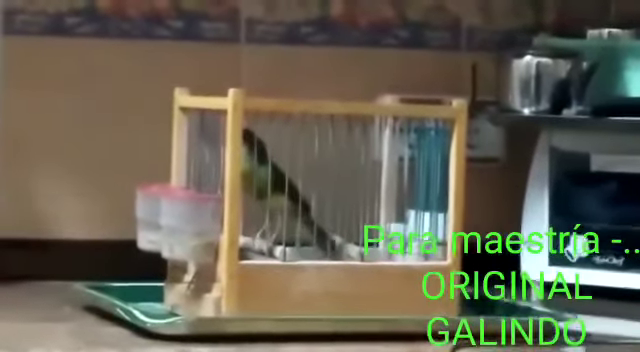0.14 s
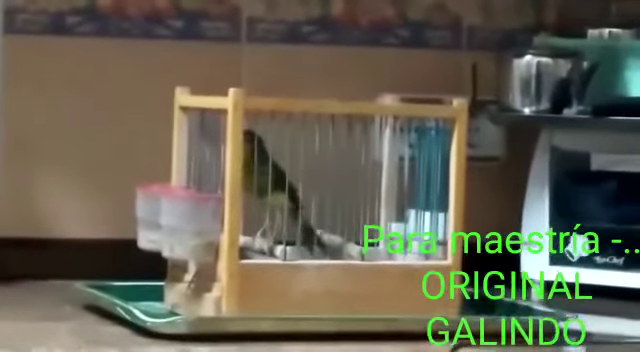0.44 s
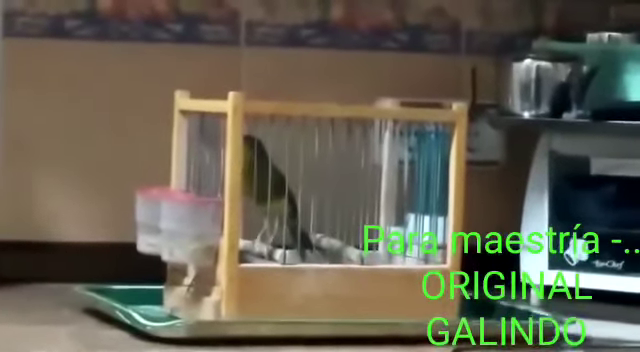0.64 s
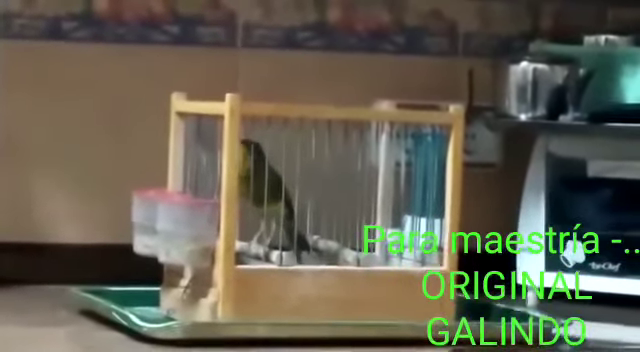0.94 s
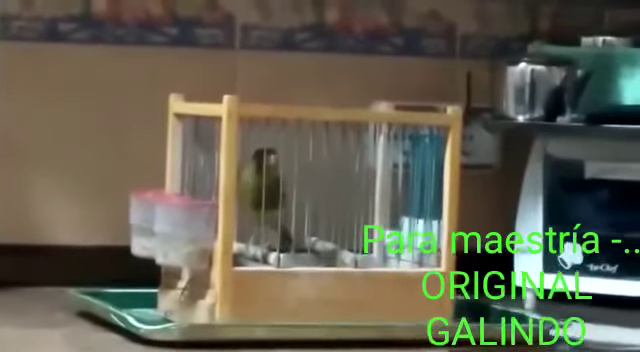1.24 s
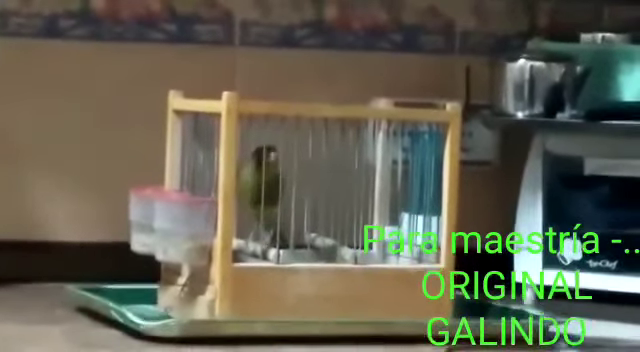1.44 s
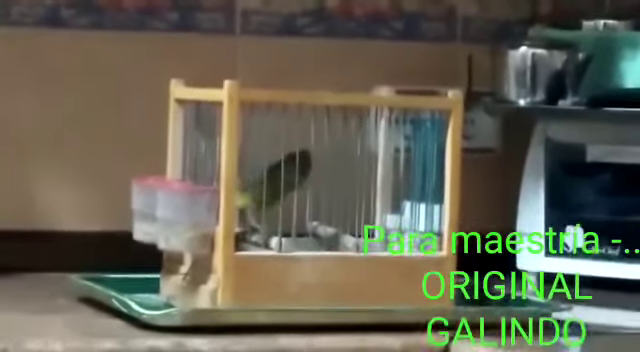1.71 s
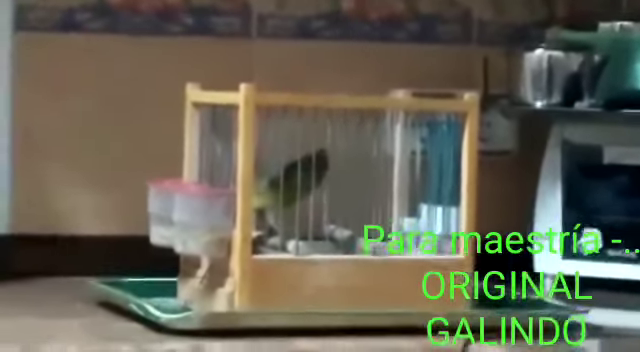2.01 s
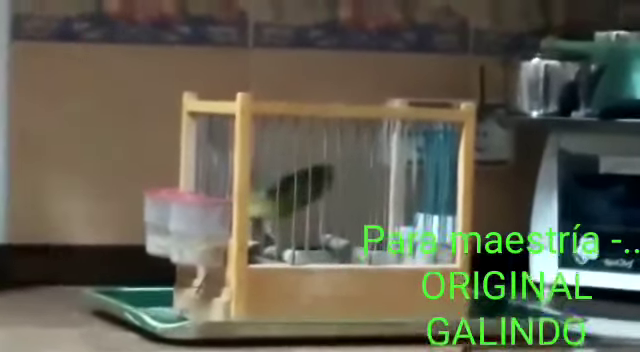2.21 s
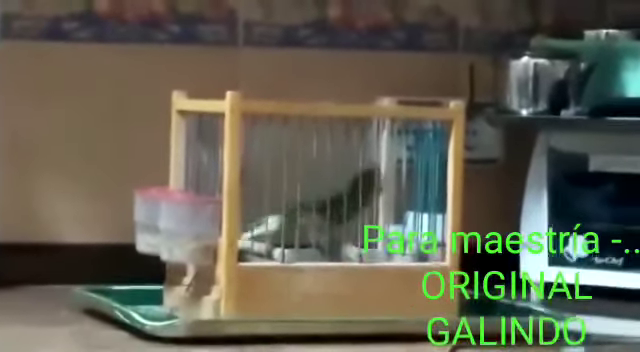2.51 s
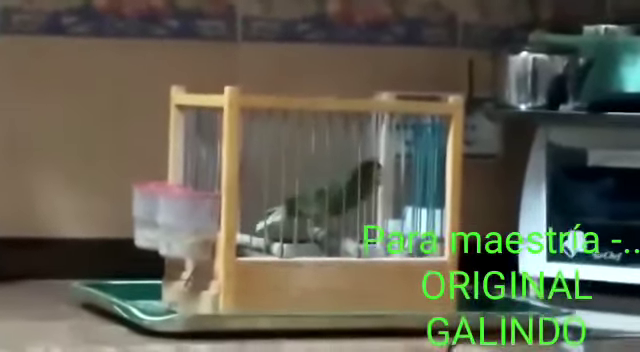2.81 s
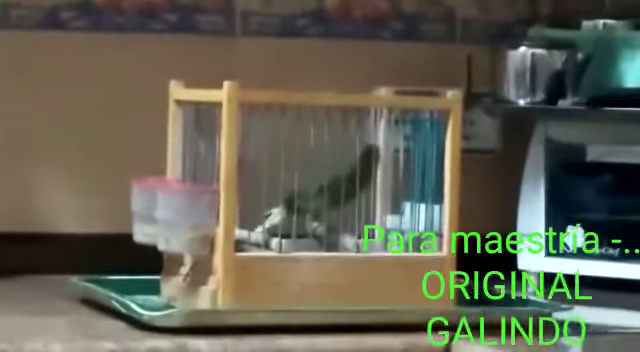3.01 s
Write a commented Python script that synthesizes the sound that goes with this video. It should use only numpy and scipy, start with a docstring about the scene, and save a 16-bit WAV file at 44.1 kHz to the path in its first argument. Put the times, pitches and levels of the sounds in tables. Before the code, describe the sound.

Small songbird trills continuously in a hard-walled kitchen: sharp downward chirps, a quick two-note roll, louder chirps.

```python
"""A caged canary sings in a small hard-walled kitchen, a metre from a two-port microphone.
Falling whistles come first, then a fast two-note roll, then wider falling whistles.
Each note is a sine on a gliding pitch with faint harmonics; dense random echoes smear it.
Filtered noise makes the quiet floor beneath, in which a soft low rumble swells twice.
A slow gain control turns the loud passages down."""
import sys
import numpy as np
from scipy import signal
from scipy.fft import rfft, irfft, next_fast_len
from scipy.io import wavfile
from scipy.ndimage import uniform_filter1d

SR = 44100
rng = np.random.default_rng(int(sys.argv[2]) if len(sys.argv) > 2 else 0)


def log_audio(samples):
    """Write samples as a 16-bit WAV file to the path given in sys.argv[1]."""
    # one column per channel
    frames = np.atleast_2d(samples).T
    # limit to full scale, then quantise
    limited = np.clip(frames, -1, 1)
    pcm = np.round(limited * 32767).astype(np.int16)
    wavfile.write(sys.argv[1], SR, pcm)


def elevation(decibels):
    """Turn decibel levels (scalar or array-like) into linear amplitude ratios."""
    levels = np.asarray(decibels, float)
    return 10 ** (levels / 20)


N = 138915
PAD = 8820  # samples of lead-in, so that notes and echoes can begin before the start


def read(points, hz):
    """A spectral curve given at a few points is interpolated on a logarithmic frequency axis."""
    f, value = np.transpose(points)
    return np.interp(np.log(hz + 1), np.log(f + 1), value)


def pair(a, b, alike):
    """Correlation between two channels: the right spectrum shares the part alike with the left."""
    c = np.clip(alike, -1, 1)
    return np.array([a, c * a + np.sqrt(1 - c ** 2) * b])


def add(mix, s, sound):
    """Superposition: a sound is summed into the mix from s seconds on."""
    part = mix[PAD + round(s * SR):][:len(sound)]
    part += sound[:len(part)]


def whistle(hz, db, rise_s, end_s, overtones_db, weak_db=0):
    """Phase is the integral of frequency; harmonics fade first where the voice is weak."""
    t = np.arange(len(hz)) / SR
    phase = 2 * np.pi * np.cumsum(hz) / SR
    ramp = np.clip(np.minimum(t / rise_s, t[::-1] / end_s), 0, 1)
    strength = elevation(weak_db) * np.sin(np.pi / 2 * ramp) ** 2
    tone = 0
    for k, overtone_db in enumerate([0, *overtones_db], start=1):
        tone = tone + elevation(overtone_db) * strength ** k * np.sin(k * phase)
    return elevation(db) * tone


def falls():
    """Linear frequency glides fall, weaken below a knee and ease out at the bottom pitch."""
    # Each row: time in seconds at which the straight glide passes pass_hz, level in dB, top pitch in Hz,
    # fall in Hz per second, gain in dB reached towards the low end.
    glides = [(-.17, -45, 7670, 70000, -9), (-.078, -26, 7200, 69520, -11.5), (.013, -28, 7270, 71030, -8),
              (0.103, -25.5, 7100, 69900, -16), (0.199, -27.5, 7260, 69600, -27),
              (0.288, -28.5, 7450, 70000, -9), (.382, -28.5, 7130, 70500, -13.5),
              (.476, -27, 7390, 70100, -9.5), (0.567, -28, 7390, 69100, 1),
              (0.659, -28, 7250, 71500, -13.5), (0.755, -28, 7180, 71100, -9.5),
              (0.853, -29, 7246, 72300, -16.5), (0.956, -30, 7360, 67100, 1),
              (2.567, -22.5, 6190, 72200, -3.5), (2.682, -20.5, 7430, 62000, -9),
              (2.793, -21, 7436, 63600, -16.5), (2.906, -22, 7440, 63500, -1), (3.023, -24, 7287, 63000, 5),
              (3.136, -25, 7610, 63000, -12)]
    # Strength along the glide, one list for each phrase. Each row: pitch in Hz, gain in dB.
    phrase_strength = ([(3000, -7), (3600, 1), (4250, -1.5), (4600, -0.5), (5900, 0), (6300, -8.5),
                       (7300, -17)], [(3000, 0.5), (3250, -24), (3850, -23.5), (4200, -2), (5000, 0.8),
                       (6500, 2.1), (7400, -7)])
    second_phrase_s, pass_hz = 2.5, 5500
    bottom_hz, ease_hz = 3009, 143
    knee_hz, knee_width_hz = 4240, 2850
    rise_s, end_s = 0.0036, 0.0026
    out = np.zeros(PAD + N)
    for s, db, top_hz, fall, low_db in glides:
        t = np.arange(0, (top_hz - bottom_hz) / fall + end_s, 1 / SR)
        straight_hz = top_hz - bottom_hz - fall * t
        hz = bottom_hz + ease_hz * np.logaddexp(0, straight_hz / ease_hz)
        weak_db = read(phrase_strength[int(s > second_phrase_s)], hz)
        weak_db = weak_db + low_db * np.clip((knee_hz - hz) / knee_width_hz, 0, 1)
        start_s = max(s - (top_hz - pass_hz) / fall, -PAD / SR)
        add(out, start_s, whistle(hz, db, rise_s, end_s, [-30.5, -32.5], weak_db))
    return out


def tails():
    """Reverberation: two unrelated sparse echo trains, each band decaying at its own rate."""
    # Each row: frequency in Hz, time in seconds to decay by 60 dB.
    decay = [(1500, 0.64), (3000, 0.37), (5000, 0.54), (7000, 0.25), (12000, 0.61)]
    room_db, early_db, early_s = 6, -9.5, 0.011  # energies in dB, then early decay time
    t = np.arange(SR // 2) / SR
    taps = rng.standard_normal((2, len(t)))
    taps = taps * (rng.random((2, len(t))) < .1) * (t > .002)
    hz, frame_s, z = signal.stft(taps, SR, nperseg=128)
    z = z * elevation(-60 * frame_s / read(decay, hz)[:, None])
    tail = signal.istft(z, SR, nperseg=128)[1][:, :len(t)]
    tail = tail / np.linalg.norm(tail, axis=1)[:, None]
    early = taps * np.exp(-t / early_s)
    early = early / np.linalg.norm(early, axis=1)[:, None]
    return elevation(room_db) * tail + elevation(early_db) * early


def heard(song):
    """Convolution: direct sound plus echoes that change as the bird turns, through both ports."""
    # Beak, cage and microphone colour. Each row: frequency in Hz, gain in dB.
    colour = [(1100, 1.5), (1600, -2.5), (2200, -2), (2900, 3.5), (3400, 1.5), (3800, -4), (4400, 0.5),
              (5000, 5), (6000, 0), (7000, -5), (7700, -7), (8300, -14), (8800, -30), (9500, 0.5),
              (11500, -13.5), (12700, -24.5), (13600, -6.5), (15500, -20.5)]
    # Difference between the ports. Each row: frequency in Hz, left minus right in dB.
    ports = [(2000, 1.5), (5600, -1.5), (6500, 7), (7500, 11), (10000, 7.5), (14000, 10.5)]
    # Likeness of the two ports. Each row: frequency in Hz, correlation from -1 to 1.
    likeness = [(2000, -0.29), (2500, 1), (2900, -0.79), (3200, -0.97), (3600, -0.95), (3900, -0.94),
                (4150, 0.84), (4600, -0.0022)]
    # Direct sound as the bird turns. Each row: time in seconds, gain in dB.
    facing = [(0, -3), (.4, -2), (1.001, 4), (1.3, 2.5), (1.699, -0.5), (2.452, 0.5), (2.601, 3),
              (3.15, 3.5)]
    lag_s, turn_hz = .00004, 0.586  # lag of the unlike direct part; half cycles of the echo blend per second
    size = next_fast_len(len(song) + SR // 2)
    hz = np.fft.rfftfreq(size, 1 / SR)
    alike = read(likeness, hz)
    s = (np.arange(len(song)) - PAD) / SR
    direct = song * elevation(np.interp(s, *np.transpose(facing)))
    z = rfft(direct, size) * pair(hz * 0 + 1, np.exp(-2j * np.pi * hz * lag_s), alike)
    turn = np.pi * turn_hz * np.arange(len(song)) / SR
    for k in range(3):
        # the squares of the three shares always sum to one
        share = np.sqrt(2 / 3) * np.cos(turn + k * np.pi / 3)
        z = z + rfft(song * share, size) * pair(*rfft(tails(), size), alike)
    z = z * elevation(read(colour, hz) + np.outer([.5, -.5], read(ports, hz)))
    return irfft(z, size)[:, PAD:PAD + N]


def floor():
    """Filtered noise: quiet house hum and microphone hiss, with two swells of soft low rumble."""
    # Each row: frequency in Hz, spectral gain in dB.
    hum = [(15, -66), (25, -36), (134, -3), (179, -8), (414, -11), (573, -10), (618, -9), (889, -12),
           (978, -10), (2400, -13), (3120, -44), (5280, -120)]
    # Each row: frequency in Hz, correlation of left and right.
    likeness = [(40, 1), (120, 0.5), (340, 0.76), (800, 0.12), (1500, 0.19)]
    # Each row: centre in seconds, half width in seconds, peak gain in dB on the low band.
    swells = [(.19, 0.16, 12), (1.308, 0.11, 11.5)]
    floor_db, hiss_db = -69.5, -79  # rms of the channel mean without swells; hiss against 0 dB of the hum curve
    hz, t = np.fft.rfftfreq(N, 1 / SR), np.arange(N) / SR
    z = pair(*rfft(rng.standard_normal((2, N))), read(likeness, hz))
    x = irfft(z * (elevation(read(hum, hz)) + elevation(hiss_db)), N)
    band = signal.butter(2, (233, 523), "bandpass", fs=SR, output="sos")
    low = signal.sosfilt(band, x)
    swell_db = sum(db * np.exp(-((t - s) / half) ** 2) for s, half, db in swells)
    swell = elevation(swell_db) - 1
    return elevation(floor_db) * (x + swell * low) / x.mean(0).std()


def roll():
    """Exponential pitch relaxation: two voices scoop upward and settle on their end pitches."""
    # Each row: syllable time in seconds, low note level in dB, high note level in dB.
    syllables = [(1.024, -68, -23), (1.095, -37.5, -23.5), (1.162, -35, -24.5), (1.225, -33, -22),
                 (1.295, -40.5, -24), (1.360, -41.5, -25.5), (1.426, -42.5, -24), (1.491, -40, -30),
                 (1.561, -42.5, -27), (1.628, -45, -26), (1.695, -41, -28), (1.765, -41, -29.5),
                 (1.829, -43, -27.5), (1.895, -43, -27), (1.964, -43.5, -28.5), (2.031, -42, -29.5),
                 (2.099, -42, -25.5), (2.167, -43, -25.5), (2.237, -41, -25.5), (2.308, -39, -27.5),
                 (2.380, -40, -23.5), (2.451, -40.5, -27)]
    # Each row: time in seconds, pitch factor of the high notes, twin level in dB against the high note,
    # seconds of scoop left unvoiced.
    drift = [(1.051, 1.006, -13, 0.0037), (1.25, 0.98, -8.5, 0.0027), (1.399, .99, -8.5, .001),
             (1.903, 0.96, -5, .0005), (2.151, 0.97, -3, 0.00056), (2.35, .955, -6, .0005),
             (2.5, 0.97, -5.5, 0.00058)]
    # Low note, high note, and the other voice's twin, which repeats the high pitch with the next low note.
    # Each: offset in seconds, length in seconds, start pitch in Hz, end pitch in Hz, settling time in seconds.
    low, high, twin = (-.007, .024, 1200, 3100, .006), (.024, .023, 3300, 4200, .009), (0.055, 0.022, 3300, 4150, 0.008)
    wobble = 0.01234  # relative pitch scatter from note to note
    rise_s, end_s = .003, .005
    out = np.zeros(PAD + N)
    scatter = 1 + wobble * rng.standard_normal((len(syllables), 3))
    at, pitch, twin_gain, unvoiced = np.transpose(drift)
    for (s, low_db, high_db), (a, b, c) in zip(syllables, scatter):
        up = np.interp(s, at, pitch)
        late = max(np.interp(s, at, unvoiced), 0)
        twin_db = high_db + np.interp(s, at, twin_gain)
        notes = [(high, high_db, b * up, [-19.5, -28.5, -27.5]),
                 (low, low_db, a, [-26, -34]),
                 (twin, twin_db, c * up, [-25])]
        for (offset, length, from_hz, to_hz, settle), db, factor, overtones_db in notes:
            t = np.arange(late, length, 1 / SR)
            hz = factor * (to_hz + (from_hz - to_hz) * np.exp(-t / settle))
            add(out, s + offset + late, whistle(hz, db, rise_s, end_s, overtones_db))
    return out


def scene():
    """Superposition of the song, heard through the room, and the floor."""
    return heard(falls() + roll()) + floor()


def top_cut(x):
    """Nothing passes above the cut-off."""
    return signal.sosfilt(signal.butter(12, 15800, fs=SR, output="sos"), x)


def record(dry):
    """Level compression: slow gain control removes a share of the decibels above a threshold."""
    level_db, squeeze, follow_s = -28, 0.56, 0.13  # threshold, share removed, averaging time
    half = int(follow_s * SR / 2)
    # the shifted window averages past power only
    power = uniform_filter1d((dry ** 2).mean(0), 2 * half + 1, origin=half)
    power_db = 10 * np.log10(abs(power) + 1e-12)
    mix = dry / elevation(squeeze * np.maximum(power_db - level_db, 0))
    return top_cut(mix)


dry = scene()
out = record(dry)
log_audio(out)
```